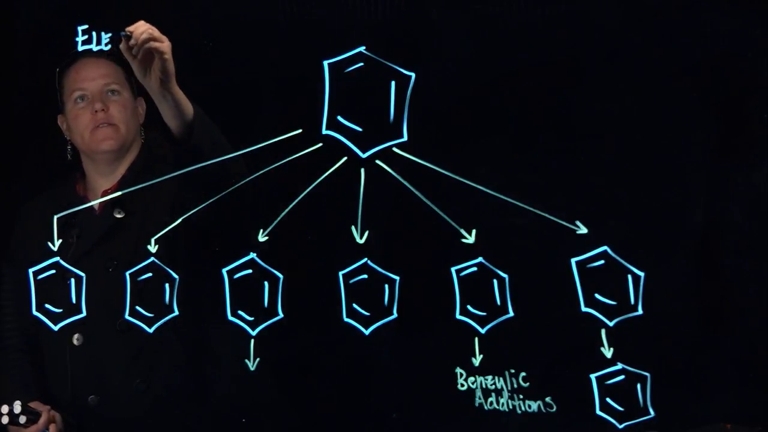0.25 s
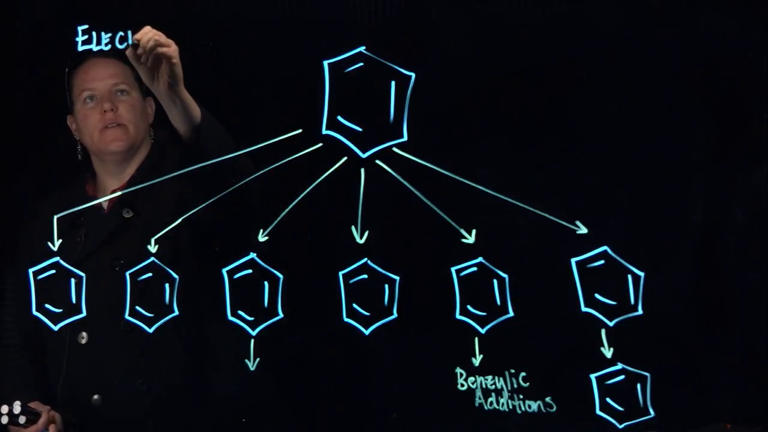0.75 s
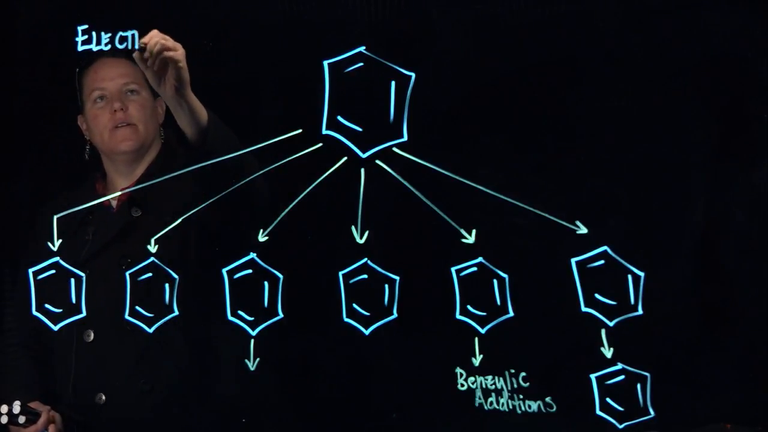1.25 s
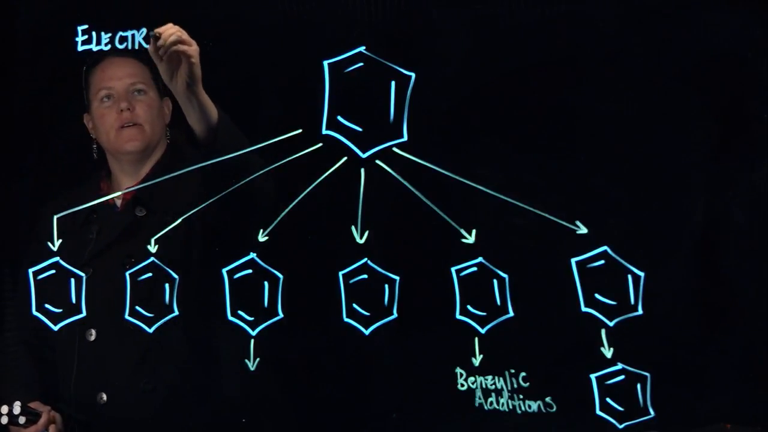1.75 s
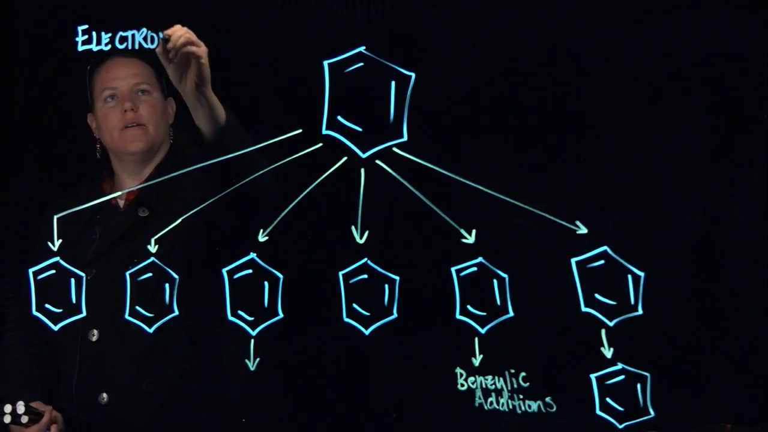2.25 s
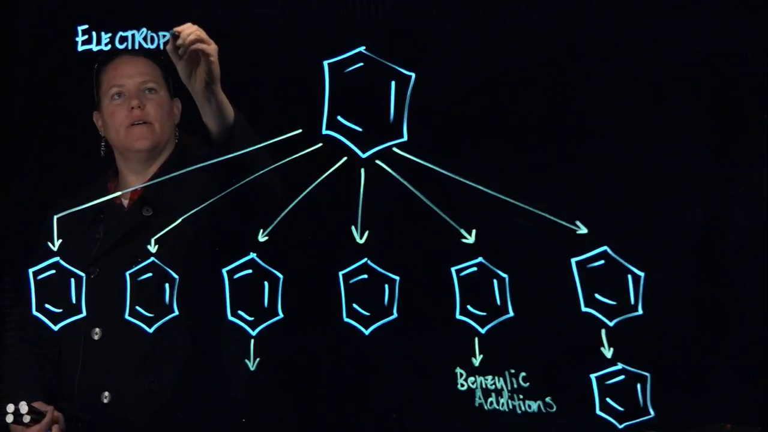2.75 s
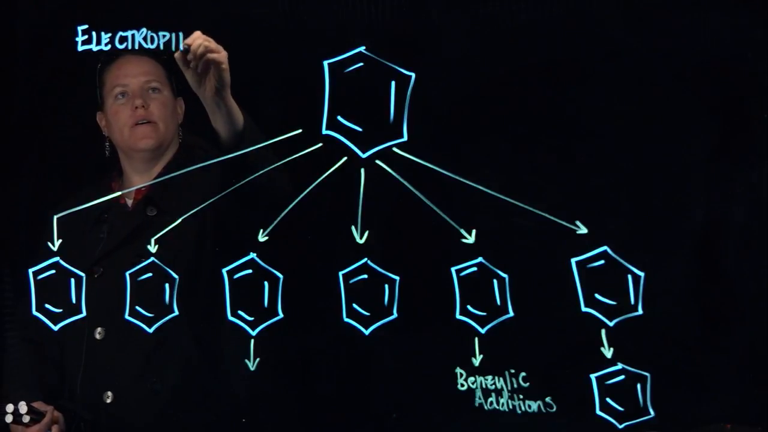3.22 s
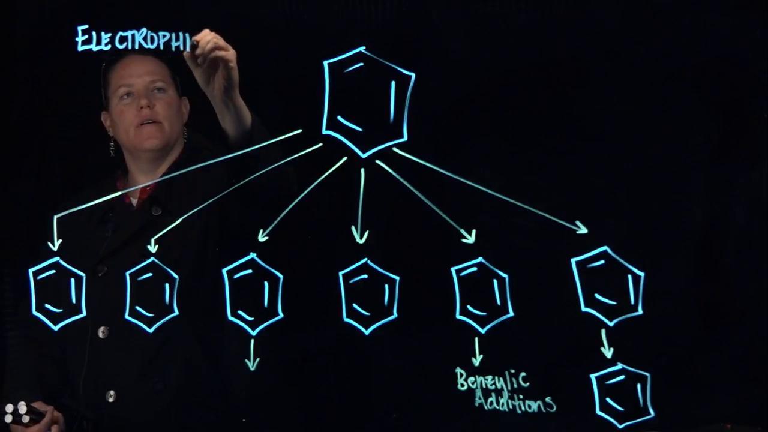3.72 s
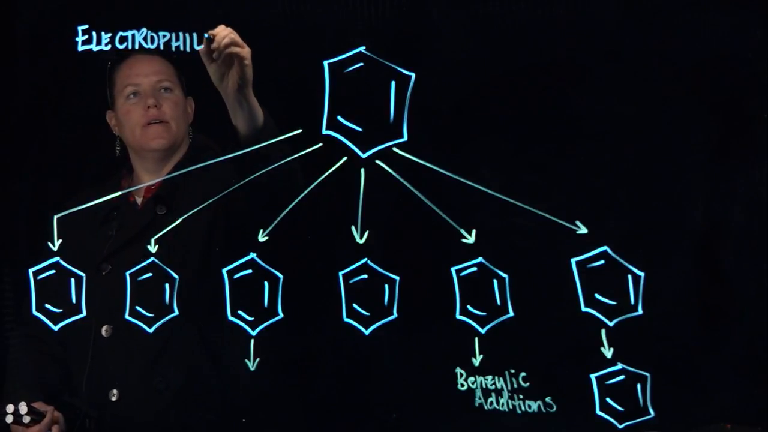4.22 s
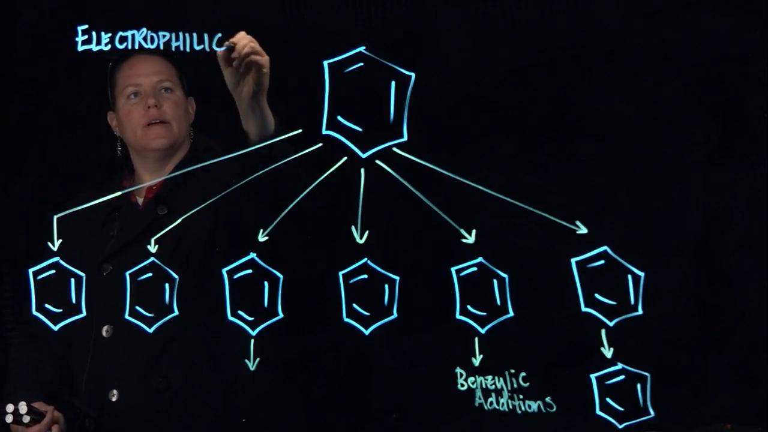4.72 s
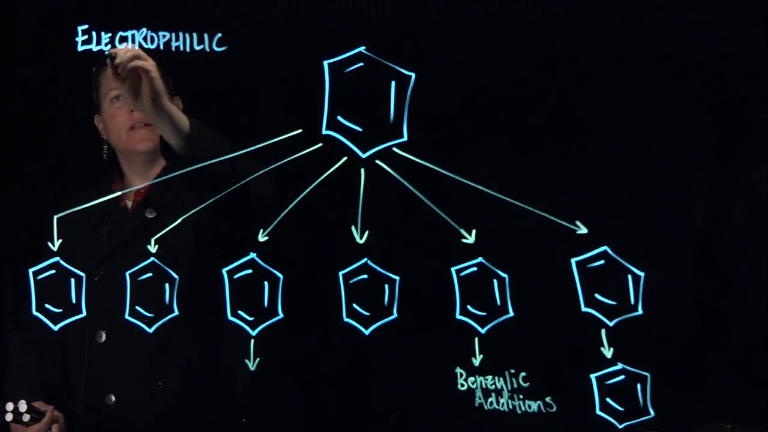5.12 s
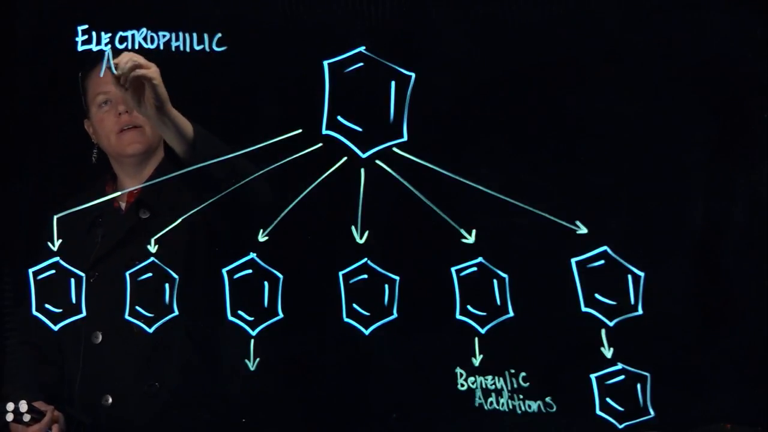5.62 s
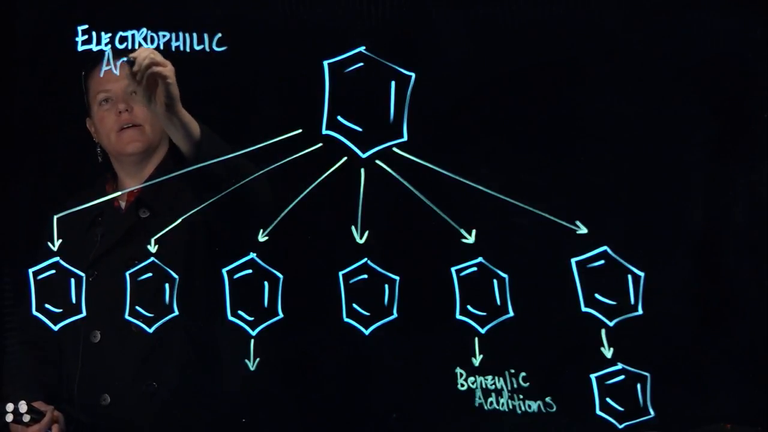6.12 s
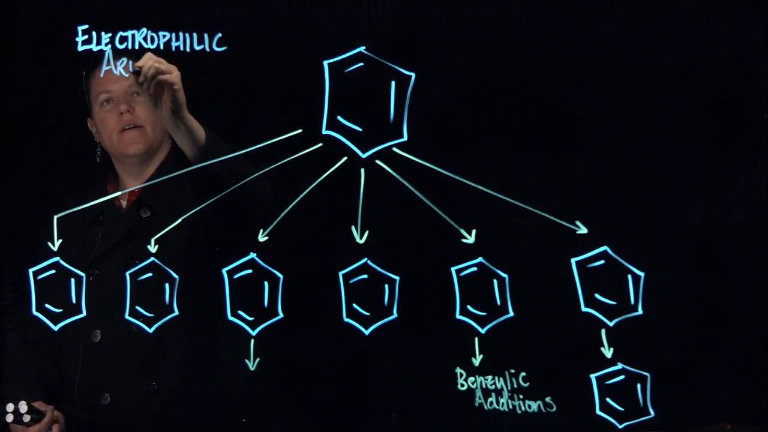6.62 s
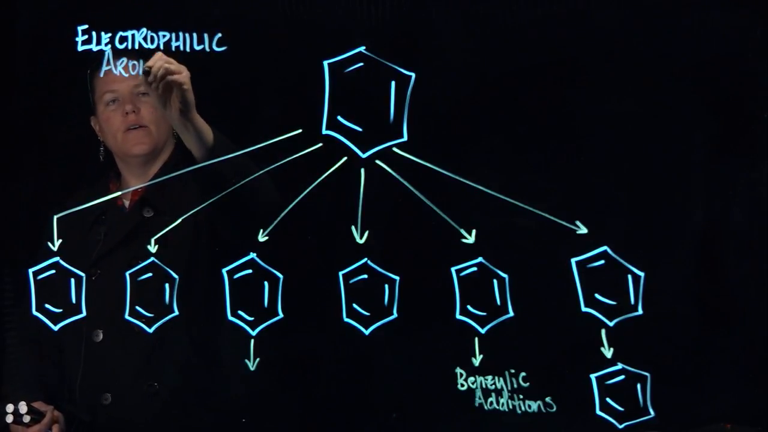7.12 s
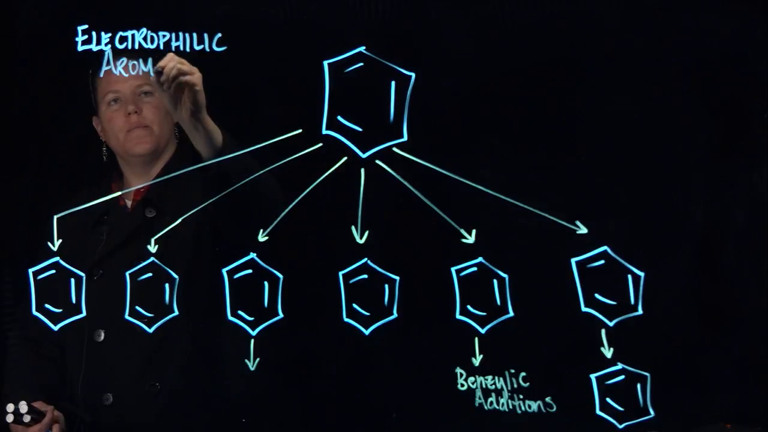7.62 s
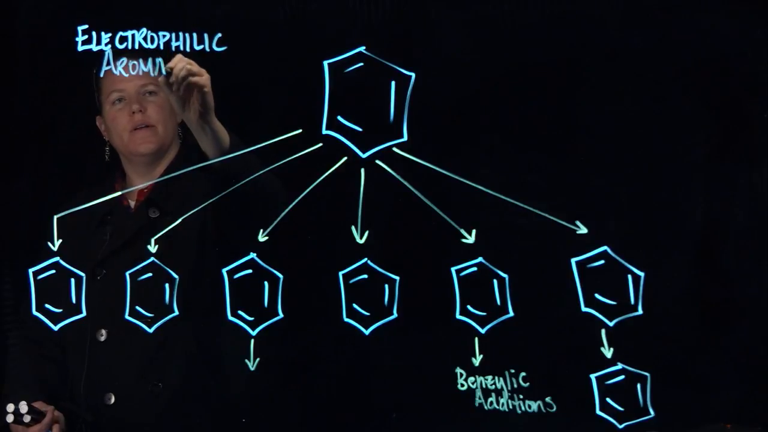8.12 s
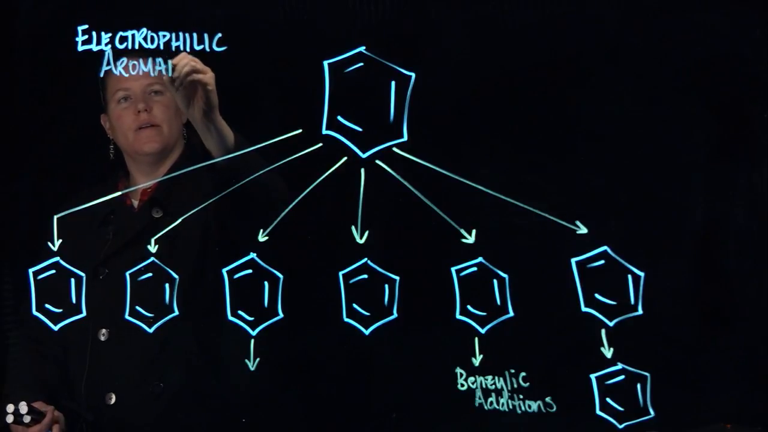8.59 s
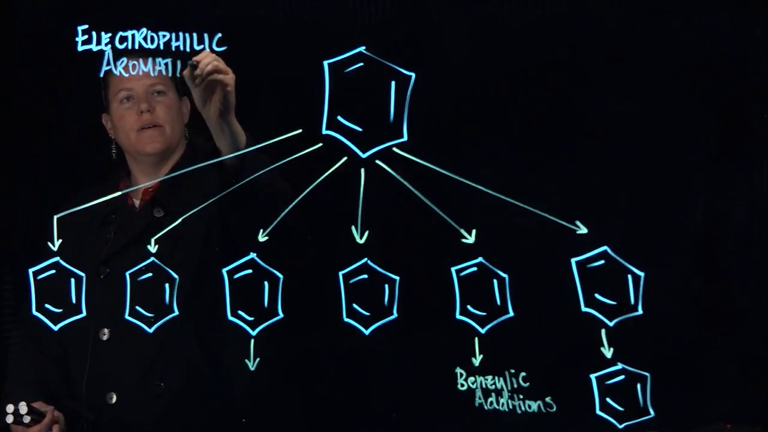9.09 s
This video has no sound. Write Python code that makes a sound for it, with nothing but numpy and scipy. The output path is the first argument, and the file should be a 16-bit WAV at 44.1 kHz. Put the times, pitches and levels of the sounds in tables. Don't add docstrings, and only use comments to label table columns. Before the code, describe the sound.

A felt marker writes on a glass board in a small dry studio, picked up by a small microphone on the writer's chest. Low ventilation rumble swells and sinks throughout, with faint steady hiss. At 0 s cloth rustles; a thin squeak sounds at 0.5 s with a dull knock just after. Soft breathy strokes and tiny ticks continue, with brief squeals around 2 s. From 2.2 to 4.5 s the writing is mostly faint, with one clearer tick near 3.6 s. A strong squeal cries at 4.6-4.7 s. After a sleeve swish, 5.2-5.4 s brings a piercing falling whistle, a hard snap and quick chirps, then a sinking squeak at 5.5 s. Knocks land near 6.5 s; squeaks and a high whistle at 6.7-6.8 s, another squeal at 7.4 s. Lighter hissing strokes, ticks, cuff rubs and cloth movement follow, with a short chirp at 8.7 s and breathy strokes to the end.

```python
import sys
import numpy as np
from scipy import signal
from scipy.fft import rfft, irfft
from scipy.io import wavfile
from scipy.ndimage import uniform_filter1d

SR = 44100
rng = np.random.default_rng(int(sys.argv[2]) if len(sys.argv) > 2 else 0)


def unload_audio(sound):
    columns = np.transpose(np.atleast_2d(sound))
    steps = np.round(np.clip(columns, -1, 1) * 32767)
    wavfile.write(sys.argv[1], SR, steps.astype(np.int16))


def undo_db(level):
    steps = np.asarray(level, float) / 20
    return 10 ** steps


N = 412335
TOP_HZ = 15800


def colour(points, lo_hz, hi_hz):
    hz = np.arange(N // 2 + 1) * SR / N + 1e-3
    f, db = np.transpose(points)
    gain = undo_db(np.interp(np.log(hz), np.log(f), db, left=-90, right=-90))
    inside = (hz > lo_hz) & (hz < hi_hz)
    gain = gain / np.sqrt(np.sum(gain[inside] ** 2) / len(hz))
    return irfft(gain * rfft(rng.standard_normal(N)), N)


def walk(rate_hz, size=N):
    k = max(int(SR / rate_hz), 1)
    steps = np.repeat(rng.standard_normal(size // k + 1), k)
    return 1.7 * uniform_filter1d(uniform_filter1d(steps, k), k)[:size]


def band(x, hz, width_hz):
    return signal.lfilter(*signal.iirpeak(hz, hz / width_hz, fs=SR), x)


def add(out, start_s, sound):
    i = int(start_s * SR)
    out[i:i + len(sound)] += sound[:N - i]


def arch(start_s, length_s, power):
    t = np.arange(N) / SR
    return np.sin(np.pi * np.clip((t - start_s) / length_s, 0, 1)) ** power


# f/Hz, level/dB per Hz
VENT_SPECTRUM = [(12, -32), (20, 2.5), (33, 4), (49, -5.5), (63, 4), (91, -8), (130, 1.5), (176, -4.5),
                 (200, -8.5), (257, -13), (303, -23), (330, -23), (401, -17), (430, -23), (467, -16.5),
                 (522, -25.5), (560, -27), (730, -49), (1230, -120)]
DEEP_DB, DEEP_FOLLOWS = -34, .9


def ventilation(background_db, swing_db, gust_db):
    deep_points = [p for p in VENT_SPECTRUM if p[0] < 95] + [(105, -12.0), (130, -35.5)]
    drone_points = [(75, -37.0), (95, -7.5)] + [p for p in VENT_SPECTRUM if p[0] > 95]
    deep = undo_db(DEEP_DB + DEEP_FOLLOWS * swing_db) * colour(deep_points, 22.0, 68.0)
    return deep + undo_db(background_db + gust_db) * colour(drone_points, 89.0, 480.)


# f/Hz, level/dB per Hz
HISS_SPECTRUM = [(1500, -14), (3000, -2), (6000, -0.5), (10000, -1.5), (14000, -2), (16500, -2)]
HISS_DB, HISS_FOLLOWS = -69, 0.69
CREEP_DB_PER_S = 0.16


def microphone_hiss(swing_db):
    t = np.arange(N) / SR
    level_db = HISS_DB + HISS_FOLLOWS * swing_db + CREEP_DB_PER_S * (t - 6.0) + .4 * walk(6)
    return undo_db(level_db) * colour(HISS_SPECTRUM, 12900.0, 15670.0)


def fabric():
    centre_hz, width_hz, level_db, ends_s = 12270, 2800, -65, 0.33
    fade = np.clip(1 - np.arange(N) / SR / ends_s, 0, 1) ** .5
    points = [(centre_hz - width_hz, -14), (centre_hz, 0), (centre_hz + width_hz, -14)]
    return undo_db(level_db) * fade * colour(points, 9000., 15000.)


# f/Hz, level/dB per Hz
AIR_SPECTRUM = [(380, -26), (540, -4.5), (760, -7), (1070, -11.5), (1500, -15.5), (2200, -20.5),
                (3000, -26), (4500, -29.5), (7000, -45)]
# start t/s, length t/s, level/dB
SWISHES = [(-.3, 0.8, -48), (0.44, 0.22, -49), (.66, 0.11, -58), (1.19, 0.063, -45.5), (1.27, 0.073, -52.5),
           (1.507, .11, -59), (1.88, 0.24, -51.5), (2.19, 0.29, -67), (3.577, 0.46, -57), (4.55, 0.3, -53),
           (4.847, 0.37, -51), (5.196, 0.16, -47), (5.334, 0.15, -52.5), (5.671, 0.098, -58),
           (6.02, 0.63, -47.5), (6.682, 0.18, -51), (7.05, 0.55, -51.5), (7.55, 0.28, -51.5),
           (7.875, 0.078, -50), (8.26, 0.17, -57), (8.502, 0.98, -55.5)]
AIR_DB, AIR_FOLLOWS, SWISH_BODY_DB = -56, 0.68, 1


def air_and_sleeve(swing_db, gust_db):
    power = sum(undo_db(2 * db) * arch(s, length_s, 2.4) for s, length_s, db in SWISHES)
    rush = np.sqrt(power + undo_db(AIR_DB + AIR_FOLLOWS * swing_db) ** 2) * undo_db(gust_db)
    body = np.sqrt(power) * undo_db(SWISH_BODY_DB + gust_db)
    body_points = [(170, -20), (260, 0.5), (450, -2.5), (600, -20.5)]
    return rush * colour(AIR_SPECTRUM, 523.0, 1300.) + body * colour(body_points, 200., 550.)


# t/s, level/dB
BACKGROUND_LEVEL = [(0.0, -38), (0.68, -35), (0.88, -41), (1.53, -34.5), (2.21, -37), (2.29, -33.5), (2.94, -36.5),
                    (4.19, -30.5), (4.56, -36), (4.61, -29), (6.22, -33), (6.48, -28.5), (7.21, -33.5), (7.29, -28.5),
                    (8.31, -34), (8.67, -29), (9.32, -31), (9.35, -40.5)]
BACKGROUND_MID_DB = -33.5


def background():
    background_db = np.interp(np.arange(N) / SR, *np.transpose(BACKGROUND_LEVEL))
    swing_db = background_db - BACKGROUND_MID_DB
    gust_db = 1.0 * walk(12) + .8 * walk(40)
    vents = ventilation(background_db, swing_db, gust_db)
    return vents + air_and_sleeve(swing_db, gust_db) + fabric() + microphone_hiss(swing_db)


# start t/s, length t/s, level/dB
RUBS = [(1.876, 0.33, -57), (2.203, 0.28, -61), (3.6, 0.24, -60), (4.625, .18, -56), (4.876, 0.22, -53),
        (5.53, 0.072, -57), (6.082, 0.57, -55.5), (7.072, 0.15, -57.5), (7.298, 0.14, -53),
        (7.62, .25, -65), (8.8, 0.43, -60.5)]


def rubs():
    pane_hz, width_hz = 1456, 110
    hollow = band(band(rng.standard_normal(N), pane_hz, width_hz), pane_hz, 3 * width_hz)
    touch = sum(undo_db(db) * arch(s, length_s, 0.6) for s, length_s, db in RUBS)
    return touch * undo_db(-0.5 + 1.9 * walk(30)) * hollow / np.std(hollow)


# t/s, peak level/dB, t60/ms
KNOCKS = [(0.466, -40, 25), (.492, -44, 20), (.502, -50, 20), (.608, -31.5, 14), (.733, -43, 14),
          (.766, -48, 54), (.796, -52, 18), (1.018, -45, 54), (1.204, -56, 120), (1.211, -38, 26),
          (1.223, -41, 65), (1.29, -43.5, 30), (1.565, -47, 30), (2.172, -49, 20), (3.284, -54, 15),
          (4.328, -49, 33), (5.204, -46, 30), (5.436, -46, 40), (5.464, -55, 30), (5.725, -42.5, 30),
          (6.535, -39, 60), (6.552, -36, 40), (7.696, -45, 28), (7.905, -43, 80), (8.318, -39, 35)]


def knocks():
    out, t = np.zeros(N), np.arange(4000) / SR
    push = -(t / 0.00066) ** 2 * np.exp(2 - 2 * t / 0.00048)
    for s, db, t60_ms in KNOCKS:
        decay = np.exp(-np.log(1000) * t * 1000 / max(t60_ms, 3.))
        rustle = rng.standard_normal(len(t)) * decay
        rustle = band(band(rustle, 350., 900.), 600., 1200.)
        add(out, s, undo_db(db + 4.5) * (0.36 * push + rustle / np.max(np.abs(rustle))))
    return out


# t/s, peak level/dB, centre f/Hz, brightness level/dB
TICKS = [(0.1057, -35.5, 4300, -25), (0.61, -57, 4100, -21), (0.9906, -49, 4150, -18.5),
         (1.328, -53, 4000, 4), (1.443, -48, 4200, 1.5), (2.525, -48, 4000, -10), (2.918, -51, 3590, 6),
         (3.3515, -42, 3880, -23), (3.639, -31.5, 4200, -5.5), (4.2203, -44, 3840, -17),
         (4.345, -44, 5900, -20), (4.356, -35, 4900, -26), (5.2487, -13, 5900, -6.5),
         (5.262, -20, 4505, 2.5), (5.2987, -32.5, 8630, -6.5), (5.7063, -30, 4900, -21),
         (5.931, -39.5, 4770, 1), (6.0686, -39, 4200, 1.5), (6.768, -34.5, 14500, -12.5),
         (7.553, -33, 4160, -0.5), (7.7963, -45, 4090, -5), (8.0655, -40.5, 4200, -10),
         (8.236, -43.5, 4500, -21), (8.6778, -28.5, 4660, -24.5), (8.897, -40, 4400, -17.5),
         (9.0027, -41, 5530, -15), (9.2163, -38.5, 3910, -6)]


def ticks():
    out, t = np.zeros(N), np.arange(300) / SR
    for s, db, hz, bright_db in TICKS:
        snap = np.sin(2 * np.pi * hz * t) * t / 0.00015 * np.exp(1 - t / 0.00012)
        snap = 1.67 * band(snap, hz, 0.95 * hz)
        grit = rng.standard_normal(len(t)) * np.exp(-t / 0.0045)
        grit = band(band(grit, 9100.0, 6000.), 10000., 9000.)
        add(out, s, undo_db(db) * (snap + undo_db(bright_db) * grit / np.max(np.abs(grit))))
    return out


# f/Hz, width f/Hz, level/dB
FELT = [(4200, 2700, -4.5), (5700, 890, -6.5), (7600, 1800, -6), (9200, 1300, -4), (10270, 730, -7),
        (12700, 2000, -10.5)]


def felt_hiss():
    felt, fine = 0, 0
    for hz, width_hz, db in FELT:
        fibres = band(band(rng.standard_normal(N), hz, width_hz), hz, 2 * width_hz)
        fibres = undo_db(db + 2 * walk(40)) * fibres / np.std(fibres)
        felt = felt + fibres
        if 8500 < hz < 11500:
            fine = fine + fibres
    return felt, fine


# start t/s, length t/s, level/dB
SKIMS = [(2.845, 0.037, -61), (2.893, 0.039, -58), (5.146, 0.085, -54.5), (5.223, .035, -49),
         (5.26, 0.03, -47), (5.317, .025, -44.5), (5.348, .016, -50), (5.38, 0.056, -52.5),
         (5.429, 0.036, -55.5), (7.02, .07, -66), (7.142, 0.044, -58.5), (7.265, 0.042, -61),
         (7.89, 0.043, -57.5), (7.945, .03, -59), (9.31, .038, -61)]
# start t/s, length t/s, ring f/Hz, ring level/dB, hiss level/dB
UPPER_STROKES = [(0.128, 0.044, 4250, -67, -66), (0.433, 0.087, 4000, -75, -66),
                 (0.783, 0.046, 3930, -67.5, -72), (1.188, 0.043, 4020, -63, -61),
                 (1.439, 0.082, 3830, -65, -67), (1.853, 0.1, 4060, -70, -66),
                 (1.985, 0.08, 3820, -77, -56.5), (2.277, 0.079, 4230, -78, -62),
                 (2.532, 0.057, 4270, -68, -59.5), (2.612, 0.083, 3950, -66, -61.5),
                 (2.833, 0.13, 4100, -81, -70), (3.148, 0.053, 4150, -76, -66),
                 (3.374, 0.06, 4050, -63, -65), (3.58, 0.11, 4200, -69, -64),
                 (3.628, 0.022, 3870, -58, -45.5), (3.857, 0.11, 4170, -67, -65),
                 (4.56, 0.068, 3900, -63, -54.5), (4.66, 0.057, 3950, -61, -49)]
LOWER_STROKES = [(5.247, .016, 3620, -60, -28), (5.272, .148, 3920, -67, -61),
                 (6.74, 0.031, 3800, -70, -46), (5.424, 0.14, 4420, -68, -60.5),
                 (5.725, 0.027, 4400, -57, -61), (5.896, 0.085, 4060, -76.5, -64),
                 (6.027, 0.14, 4060, -72, -59.5), (6.18, 0.073, 3830, -57, -60.5),
                 (6.329, .089, 4245, -67, -63.5), (6.591, 0.087, 4050, -69.5, -62),
                 (6.728, 0.12, 3680, -58, -53), (7.015, 0.0685, 4040, -69.5, -63),
                 (7.283, 0.076, 4200, -62, -67), (7.397, 0.066, 3830, -52, -50),
                 (7.755, 0.1, 4160, -60, -56.5), (7.888, 0.046, 4000, -72, -59),
                 (8.267, 0.055, 4200, -62, -64), (8.711, 0.046, 4250, -62, -53.5),
                 (8.914, 0.095, 4185, -59.5, -55.5)]
UPSTROKES = [
    (1.006, 0.061, 4200, -72, -66),
    (6.815, 0.054, 3540, -52, -69),
    (9.2, 0.039, 3800, -53, -54),
    (9.235, 0.061, 3960, -59, -55.5),
    (9.3, 0.11, 4220, -55, -59),
]
EVEN_STROKES = [
    (4.255, 0.12, 4200, -58, -62.5),
    (5.361, 0.051, 5360, -58, -73.5),
    (7.496, 0.11, 4160, -59.5, -57.5),
    (8.019, 0.084, 4200, -62, -56.5),
    (8.447, 0.089, 4260, -61, -58),
]
SAG_HZ_PER_S = 3600
SAG_SHARES = [(UPPER_STROKES, 1), (LOWER_STROKES, 1), (UPSTROKES, -1), (EVEN_STROKES, .45)]


def strokes():
    out = np.zeros(N)
    felt, fine = felt_hiss()
    for start_s, length_s, db in SKIMS:
        i, size = int(start_s * SR), int(length_s * SR)
        add(out, start_s, undo_db(db) * np.sqrt(np.hanning(size)) * fine[i:i + size])
    shake = (.6 + walk(520) + 1j * walk(520)) * undo_db(2.5 * walk(100))
    for start_s, length_s, hz, ring_db, hiss_db, share in [(*r, share) for rows, share in SAG_SHARES for r in rows]:
        sag_hz = SAG_HZ_PER_S * length_s * share
        span = slice(int(start_s * SR), min(int((start_s + length_s) * SR), N))
        along = np.linspace(0, 1, span.stop - span.start)
        pressure = np.clip(np.minimum(along, 1 - along) * length_s / .02, 0, 1)
        phase = 2 * np.pi * np.cumsum(hz - sag_hz * (along - .5)) / SR
        ring = np.imag(shake[span] * np.exp(1j * phase))
        add(out, start_s, pressure * (undo_db(ring_db) * ring + undo_db(hiss_db) * felt[span]))
    return out


OVERTONE_FADE, THIRD_FADE, THIRD_PER_DB = 1.4, .8, 2.45
HALF_DB_PER_HZ = -0.0508


def slip(start_s, length_s, hz0, hz1, db, attack, hold, rise_db, fall_db,
         droop_hz_per_db=0, builds_db=0, **overtones):
    u = np.linspace(0, 1, num=17)
    rising_db = -rise_db * np.clip(1 - u / attack, 0, 1) ** 2
    falling_db = -fall_db * np.clip((u - hold) / (1 - hold), 0, 1) ** 2
    below_db = rising_db + falling_db
    hz = hz0 + (hz1 - hz0) * u + droop_hz_per_db * below_db
    level_db = db + below_db
    columns = [start_s + length_s * u, hz, level_db]
    if overtones:
        fade_db = level_db + OVERTONE_FADE * below_db
        second_db = fade_db + overtones["second_db"]
        third_db = fade_db + THIRD_FADE * below_db + overtones["third_db"] + THIRD_PER_DB * (db + 25.5)
        half_db = level_db + overtones["half_db"] + builds_db * u + HALF_DB_PER_HZ * (hz - 3750)
        columns += [second_db, third_db, half_db]
    return np.transpose(columns)


def tone_track(rows, rise_s, fall_s, inertia_s):
    s, hz, *dbs = np.transpose(rows)
    t = np.arange(s[0] - rise_s, s[-1] + fall_s, 1 / SR)
    edge_db = -40 * (np.clip((s[0] - t) / rise_s, 0, 1) ** 1.5 + np.clip((t - s[-1]) / fall_s, 0, 1))
    k = max(int(inertia_s * SR), 1)

    def slew(v):
        return uniform_filter1d(uniform_filter1d(v, k, mode="nearest"), k, mode="nearest")

    wobble = 0.00094 + .012 * (max(dbs[0]) < -49)
    wander = 1 + wobble * walk(200, size=SR)[:len(t)]
    phase = 2 * np.pi * np.cumsum(slew(np.interp(t, s, hz)) * wander) / SR
    flutter_db = .25 * walk(300, size=SR)[:len(t)]
    gains = []
    for j, db in enumerate(dbs):
        steepness = 1.8 if j else 1
        gains.append(np.sqrt(2) * undo_db(slew(np.interp(t, s, db) + edge_db * steepness) + flutter_db))
    return t[0], phase, gains


# start t/s, length t/s, first f/Hz, last
# f/Hz, level/dB
WHISTLES = [(1.474, .022, 3800, 3560, -60), (5.249, .003, 9280, 9130, -23.5), (.8, .015, 3950, 3800, -69),
            (1.014, .016, 4120, 4260, -64), (1.924, .004, 4380, 4250, -46), (2.64, .014, 3900, 3830, -56),
            (3.66, .015, 2000, 1980, -58), (5.25, .004, 15200, 14900, -36),
            (2.548, 0.029, 4340, 4270, -49.5), (3.639, 0.022, 4030, 3840, -45),
            (5.25, 0.0035, 5900, 5620, -17.5), (5.255, 0.003, 5460, 5380, -14.5),
            (5.249, .005, 3700, 3550, -37.5), (5.25, 0.0051, 11550, 11000, -18),
            (5.295, .004, 3770, 3850, -46.5), (5.322, 0.011, 9200, 10200, -46),
            (5.742, .026, 10900, 10500, -57), (5.947, 0.0195, 9920, 9200, -53),
            (6.764, 0.0064, 12650, 13200, -30), (6.806, 0.044, 1913, 1870, -42),
            (1.487, .017, 2000, 1920, -62), (6.22, .025, 1940, 1925, -54), (7.077, 0.02, 4000, 3900, -59),
            (7.453, 0.01, 3650, 3480, -48), (8.725, 0.011, 4090, 4264, -26),
            (9.287, 0.0091, 4120, 4170, -45)]
WHISTLE = dict(attack=.3, hold=0.2, rise_db=2, fall_db=6)
# t/s, f/Hz, level/dB
LOUD_WHISTLES = [
    [(5.213, 10500, -36), (5.224, 9570, -10.5), (5.232, 9300, -7), (5.242, 8856, -9.5), (5.249, 8400, -14)],
    [(5.3, 9000, -10.5), (5.307, 9300, -9), (5.314, 9900, -13.5), (5.318, 10260, -25.5)],
    [(5.367, 10120, -42), (5.373, 9794, -25), (5.38, 9442, -26), (5.388, 8950, -19.5), (5.396, 8630, -26)],
    [(6.764, 8780, -25), (6.769, 9240, -11), (6.776, 9560, -13.5), (6.786, 9600, -18), (6.79, 9400, -25),
     (6.799, 9130, -25)],
]


def whistles():
    out = np.zeros(N)
    for rows in [slip(*row, **WHISTLE) for row in WHISTLES] + LOUD_WHISTLES:
        start_s, phase, (gain,) = tone_track(rows, rise_s=0.0022, fall_s=.0045, inertia_s=.0012)
        add(out, start_s, gain * np.sin(phase))
    return out


# start t/s, length t/s, first slip rate f/Hz, last slip rate f/Hz, level/dB
SWELLS = [
    (.478, 0.07, 4095, 4157, -29),
    (5.512, 0.047, 4490, 3976, -27),
    (6.664, .038, 4190, 3910, -40),
]
STUTTERS = [
    (5.2562, .0068, 3600, 3530, -21.5),
]
MUTTERS = [
    (6.81, 0.039, 3780, 3835, -42),
]
PURRS = [
    (1.928, 0.0386, 4060, 3990, -30),
]
SWELL = dict(attack=0.5, hold=.66, rise_db=37.5, fall_db=25.5, second_db=-8, third_db=-20.5, half_db=-33.5,
             droop_hz_per_db=3)
STUTTER = dict(attack=0.17, hold=0.44, rise_db=13.5, fall_db=4.5, second_db=-1, third_db=-6.5, half_db=-5.5)
MUTTER = dict(attack=.25, hold=0.54, rise_db=-4, fall_db=7.5, second_db=-15, third_db=-12.5, half_db=-2,
              builds_db=-19.5)
PURR = dict(attack=.3, hold=0.64, rise_db=7.5, fall_db=12, second_db=0, third_db=-1.5, half_db=-28)
SQUEAL_KINDS = [(SWELLS, SWELL), (STUTTERS, STUTTER), (MUTTERS, MUTTER), (PURRS, PURR)]
# t/s, slip rate f/Hz, level/dB,
# grip level/dB (2nd line over the 1st), alternation level/dB (over the 1st)
LOUD_SQUEALS = [
    [(1.996, 3670, -31, -11, -45), (1.999, 3780, -21, -8, -44), (2.007, 3760, -18.5, -7, -50),
     (2.02, 3770, -21, -10.5, -31.5), (2.03, 3840, -29, -35, -23), (2.038, 3720, -46, -25, -18)],
    [(4.573, 3720, -31, -5, -33), (4.58, 3715, -25, -3.5, -33.5), (4.588, 3764, -25, -10.5, -36.5),
     (4.594, 3867, -26.5, -21, -45), (4.603, 3930, -39.5, -28.5, -44)],
    [(4.607, 3955, -43, -35.5, -60), (4.621, 4000, -38, -39.5, -60), (4.628, 4045, -26, -13.5, -60),
     (4.634, 4020, -18.5, -3.5, -59.5), (4.654, 4105, -22, 4, -60), (4.668, 4070, -16, -9.5, -60),
     (4.687, 4075, -10, -32.5, -60), (4.695, 4166, -14, -21.5, -60), (4.701, 4080, -33, -25, -59.5)],
    [(6.738, 3900, -25.5, -14, -37.5), (6.744, 3860, -21.5, -13, -45), (6.752, 3815, -21.5, -7, -20),
     (6.758, 3773, -21.5, -7, -14.5), (6.767, 3770, -23, -9, -17.5), (6.773, 3720, -34, -16.5, -17.5)],
    [(7.396, 3565, -18, -6, -26), (7.399, 3660, -21, -4.5, -20), (7.404, 3730, -22, -8.5, -27),
     (7.411, 3780, -24, -16, -20), (7.419, 3830, -31, -27, -25), (7.427, 3802, -40, -35, -25)],
]
THIRD_EXTRA_DB = [2.5, -4, 1.5, 5.5, 4.5]
# multiple of the slip rate, level/dB
HALF_LINES = [(.5, -18.5), (1.5, 1.5), (2.5, 3.5), (3.5, -13)]
FOURTH_DB, FOURTH_DB_PER_HZ = -11.5, -0.078


def loud_squeal(rows, extra_db):
    return [(s, hz, db, db + grip_db, 1.49 * db - 4.0 + .4 * grip_db + extra_db, db + half_db)
            for s, hz, db, grip_db, half_db in rows]


def squeals():
    out = np.zeros(N)
    episodes = [slip(*row, **shape) for table, shape in SQUEAL_KINDS for row in table]
    episodes += [loud_squeal(rows, extra_db) for rows, extra_db in zip(LOUD_SQUEALS, THIRD_EXTRA_DB)]
    for rows in episodes:
        start_s, phase, (g1, g2, g3, half) = tone_track(rows, rise_s=0.0046, fall_s=0.0045, inertia_s=.002)
        stack = g1 * np.sin(phase) + g2 * np.sin(2 * phase) + g3 * np.sin(3 * phase)
        last_hz = rows[-1][1]
        if last_hz < TOP_HZ / 4:
            stack += g3 * undo_db(FOURTH_DB + FOURTH_DB_PER_HZ * (last_hz - 3600)) * np.sin(4 * phase)
        veil = np.diff(rng.standard_normal(len(phase) + 1))
        stack += (g2 * undo_db(-46) + half * undo_db(-23)) * veil
        alternation = sum(undo_db(db) * np.sin(k * phase) for k, db in HALF_LINES)
        add(out, start_s, stack + half * alternation)
    return out


def studio(x):
    t60_s, level_db, pane_db = 0.27, -29.5, 4
    t = np.arange(int(.3 * SR)) / SR
    tail = rng.standard_normal(len(t)) * np.exp(-np.log(1000) * t / t60_s) * np.clip(t / .004, 0, 1)
    tail = tail + undo_db(pane_db) * band(tail, 8100, 900)
    tail = tail / np.sqrt(np.sum(tail ** 2))
    return x + undo_db(level_db) * signal.fftconvolve(x, tail)[:N]


def scene():
    marker = knocks() + ticks() + strokes() + whistles() + squeals()
    return (background() + rubs() + studio(marker))[None]


def band_limit(x):
    return signal.sosfilt(signal.butter(12, 15820, fs=SR, output="sos"), x)


def record(dry):
    steep = signal.ellip(10, .2, 70, TOP_HZ, fs=SR, output="sos")
    mix = signal.sosfilt(steep, dry)
    return band_limit(mix)


dry = scene()
out = record(dry)
unload_audio(out)
```